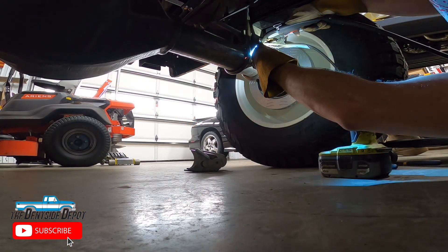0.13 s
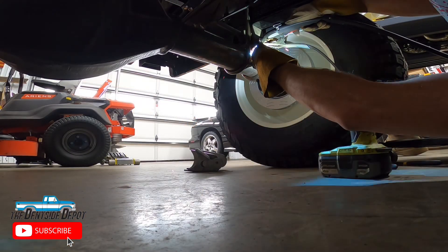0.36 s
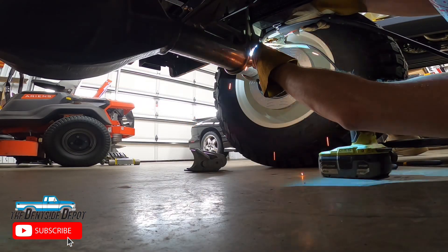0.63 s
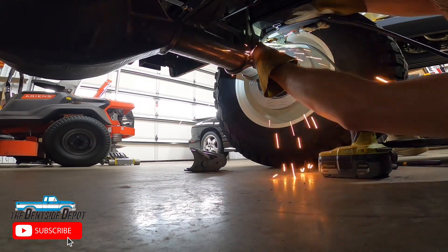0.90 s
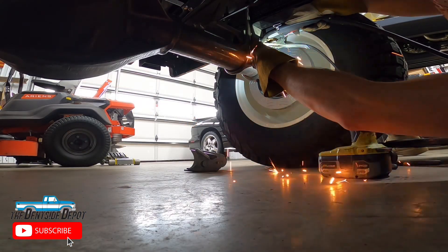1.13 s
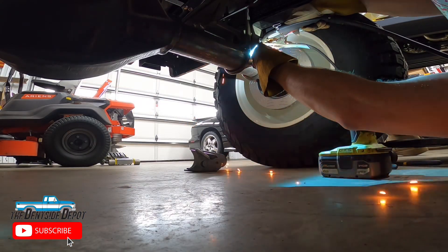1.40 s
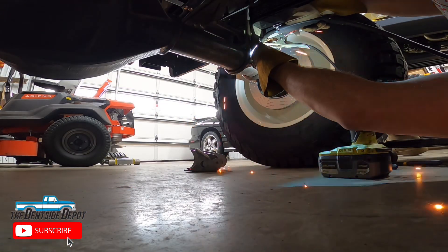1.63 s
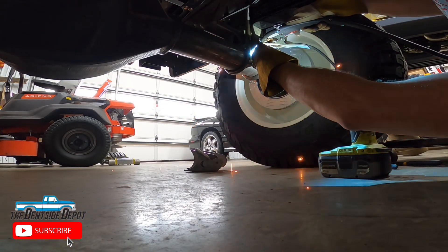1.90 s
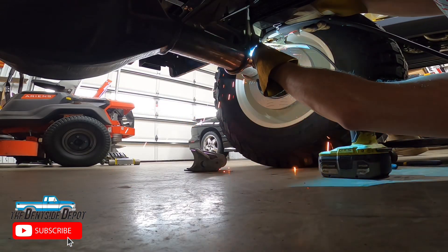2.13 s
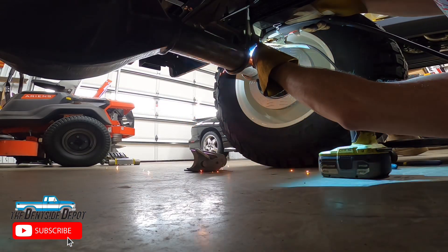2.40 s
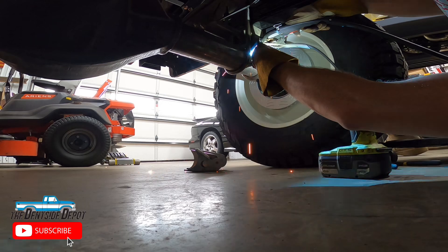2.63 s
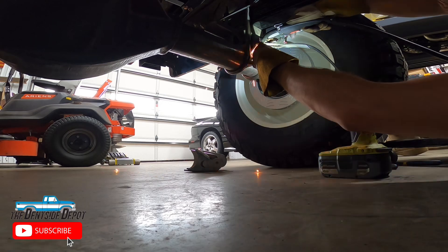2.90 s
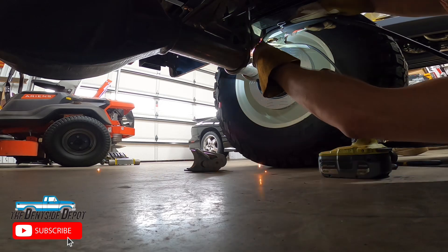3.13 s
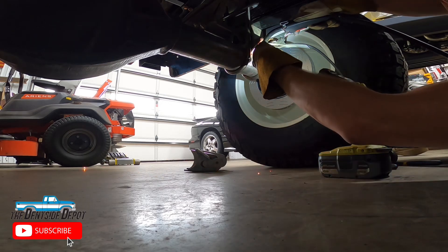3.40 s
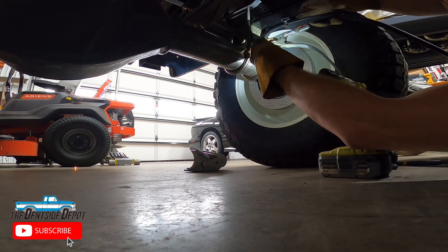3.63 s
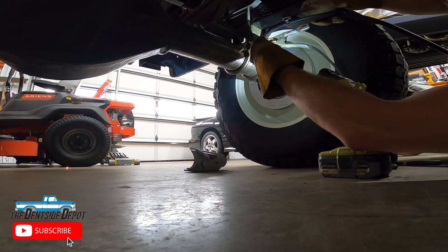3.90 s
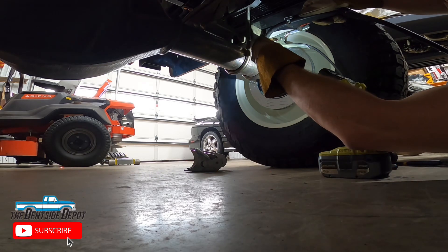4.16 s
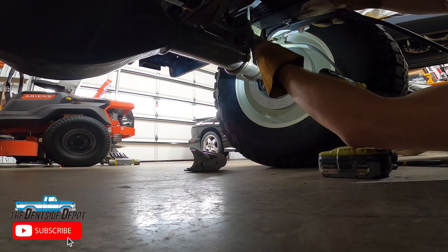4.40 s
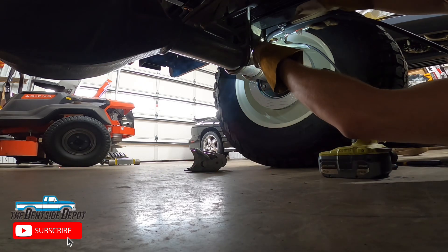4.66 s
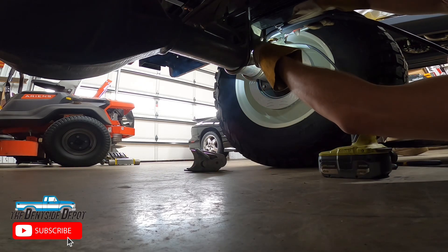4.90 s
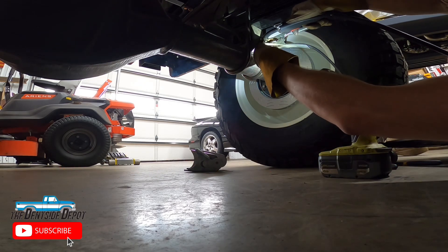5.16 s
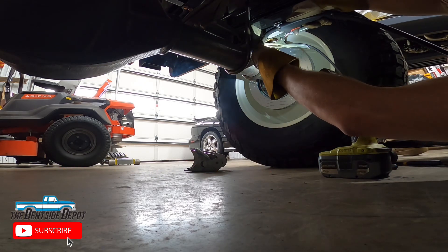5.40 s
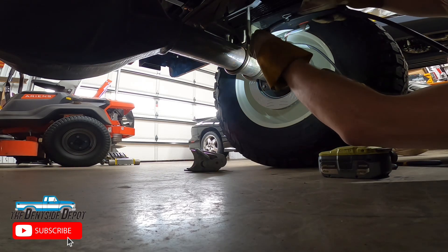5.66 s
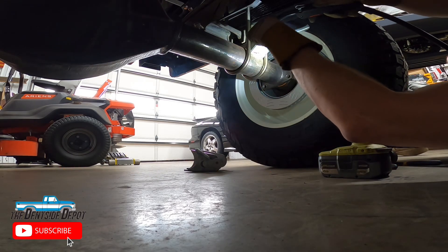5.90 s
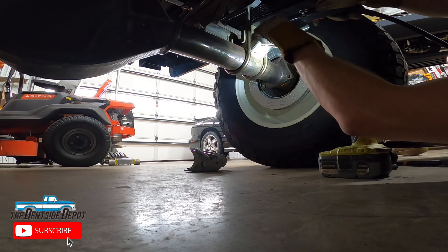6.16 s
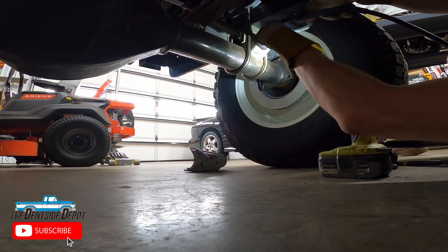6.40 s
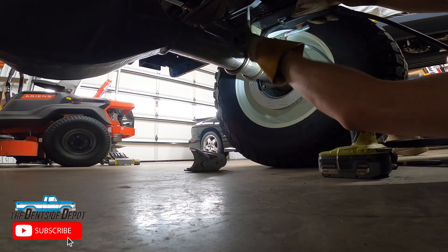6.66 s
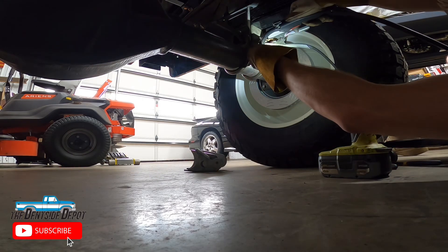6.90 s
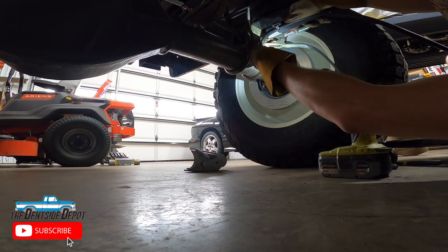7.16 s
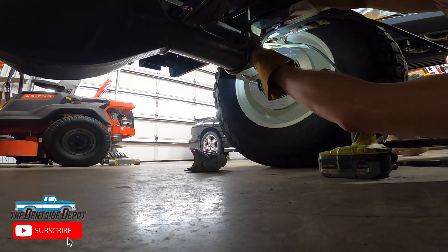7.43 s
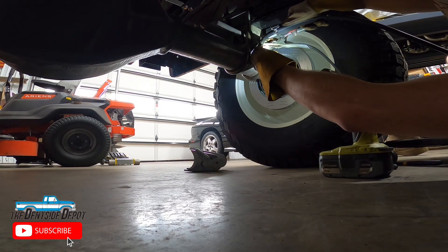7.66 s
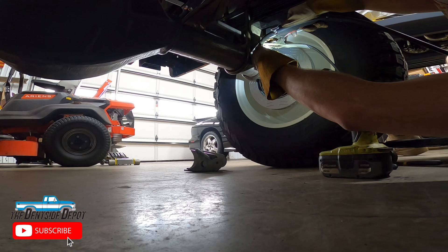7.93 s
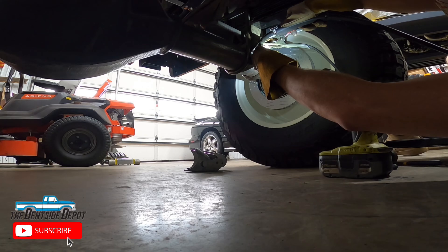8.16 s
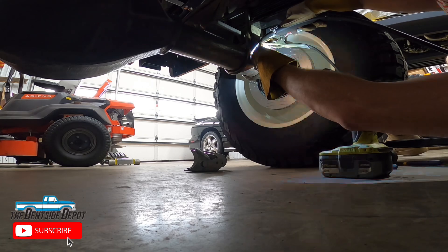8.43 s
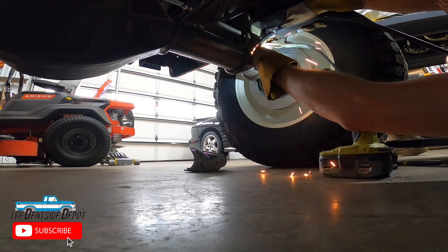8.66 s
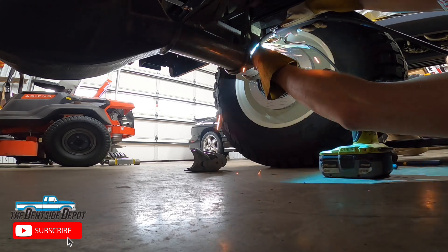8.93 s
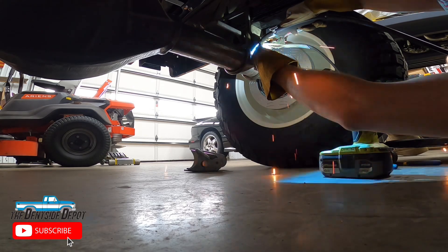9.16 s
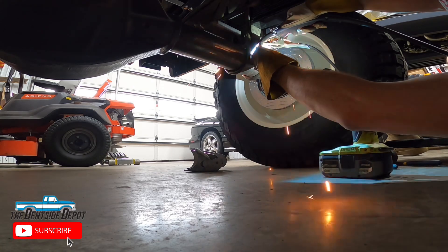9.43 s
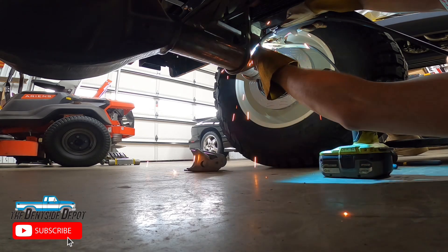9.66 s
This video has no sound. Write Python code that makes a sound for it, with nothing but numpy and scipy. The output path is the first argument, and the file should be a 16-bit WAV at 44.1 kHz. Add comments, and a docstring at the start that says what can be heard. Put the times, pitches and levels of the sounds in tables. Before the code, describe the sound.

Under a car in a workshop, a welding arc snaps in irregular hard pops and fast sputtering buzzes for about three seconds, ringing the exhaust pipe. It stops; gas hisses briefly and a valve clacks shut. A low fan hum swells up, with small metal ticks and faint glove rubs, before a gas puff and a second burst. Close microphones on the floor, peaks slightly distorted.

```python
"""A wire-feed welder tacks an exhaust pipe under a car in a workshop, close to two microphones on the floor.
The wire shorts and re-strikes in pops: each a sharp crack, its scatter off the underside and ringing metal.
Shielding gas, noise with whistling bands, hisses on briefly after the arc dies; puffs reach the right microphone.
A cooling fan hums throughout as wavering tones over air noise. The gas valve clacks shut with a puff and tools
tick in the pause, all as dying rattles; a glove brushes the pipe in soft swells, and the workshop adds a noise tail."""
import sys
import numpy as np
from scipy import signal
from scipy.fft import rfft, irfft
from scipy.io import wavfile
from scipy.ndimage import uniform_filter1d

SR = 44100
rng = np.random.default_rng(int(sys.argv[2]) if len(sys.argv) > 2 else 0)


def gain_from_decibels(decibels):
    """Convert decibel values to linear amplitude factors."""
    exponent = np.asarray(decibels, float) / 20
    return 10 ** exponent


def unload_audio(sound):
    """Save the sound as a 16-bit wav file, at the path given as the first command line argument."""
    columns = np.transpose(np.atleast_2d(sound))
    # keep every value between -1 and 1, then stretch to whole-number steps
    steps = np.round(np.clip(columns, -1, 1) * 32767)
    wavfile.write(sys.argv[1], SR, steps.astype(np.int16))


N = 432180  # length in samples

# blade tones of the fan: (f/Hz, level/dB, waver width/Hz)
FAN_TONES = [(235, -38, 6.7), (472.3, -50.5, 38), (710, -62, 15), (936, -67.5, 10), (1405, -68.5, 34)]
# colour of the fan's rush of air: (f/Hz, relative level per Hz/dB)
FAN_AIR = [(20, -35), (40, -13.5), (75, 1), (120, -30), (200, 7), (320, -12), (430, -9), (650, -13),
           (1400, -21), (4000, -38), (6000, -44.5), (9000, -60.5), (20000, -100)]
FAN_AIR_DB = -43.5
# decay of the workshop's tail: (f/Hz, t60/s)
SHOP_DECAY = [(200, 0.07), (700, 0.43), (2000, 1), (5000, 0.96), (12000, 0.361)]
# glove brushing the pipe: (t/s, level/dB, half length/s)
RUSTLES = [(5.754, -66.5, 0.033), (5.85, -65, 0.022), (6.103, -65.5, .04), (6.411, -67.5, 0.036),
           (6.965, -68, 0.027)]
# metal ticks in the pause, the gas valve's clack and puff as it shuts (3.631, 3.664), and the trigger:
# (t/s, level/dB, pitch f/Hz, t60/s)
KNOCKS = [(3.631, -34.5, 3810, 0.21), (3.664, -44, 11100, .2), (4.435, -52, 1900, 0.076),
          (5.468, -59, 4870, .042), (5.52, -36.5, 4300, 0.13), (5.53, -35.5, 1090, .2),
          (6.74, -44, 4160, .07), (8.422, -44, 6000, 0.031)]
# resonances that colour all of these: (f/Hz, width/Hz, relative level/dB)
KNOCK_MODES = [(1000, 950, 11.5), (1840, 660, 5), (2100, 130, 9.5), (3500, 610, 7), (4300, 1600, -3),
               (5030, 510, 0.5), (8740, 340, -6.5)]
# whistling bands of the torch nozzle: (f/Hz, width/Hz, relative level/dB)
NOZZLE_BANDS = [(1720, 200, -2), (5370, 200, -4), (6080, 377, -5), (6980, 330, -8.5), (8000, 300, -9),
                (9500, 500, -16.5)]
# colour of the gas jet: (f/Hz, relative level per Hz/dB)
JET_COLOUR = [(500, -57.5), (1500, -18), (3500, -23.5), (6000, -22.5), (9000, -27.5), (12000, -25.5),
              (15000, -37.5), (20000, -71)]
SHUT_S, OPEN_S = 3.63, 8.437  # the gas valve
WHISTLE_DB, WHISTLE_STOP_DB_PER_S = -47, 500
JET_DB, SURGE_DB, SURGE_S = -54.5, -35, .15  # the surge falls 10 dB in SURGE_S
DRAIN_S, DRAIN_DB_PER_S = 0.12, 187  # the hose empties after the valve shuts
# short pings as the arc dies: (t/s, level/dB, f/Hz, t60/s)
PINGS = [(2.964, -19, 1880, .04), (2.979, -18, 1850, .07)]
# low puffs of air on the right microphone just after pops: (t/s, level/dB, push +1 or pull -1)
PUFFS = [(.0088, -7, 1), (0.1559, -7.5, 1), (0.36, -8, 1), (0.495, -16, 1), (0.5102, -12, 1),
         (0.5782, -1.5, 1), (0.736, -13, 1), (0.8284, -7.5, 1), (8.5028, 0, -1), (8.619, -11, 1),
         (8.6533, -3.5, -1), (8.773, -16, 1)]
# colour of the pops' crack: (f/Hz, relative level per Hz/dB)
CRACK_COLOUR = [(40, -32.5), (300, -20), (1200, -9.5), (2200, 2), (2900, -3.5), (3500, -4.5), (4200, 2.5),
                (6000, -3.5), (8000, -4), (10300, -11), (11600, -4), (14000, -18.5), (20000, -65)]
# ringing of the exhaust pipe: (f/Hz, relative level/dB, t60/s)
PIPE_MODES = [(203.6, -11, 0.1), (382.4, -14, 0.06), (700, -7, 0.05), (860, -12, 0.06), (1065, -4, 0.06),
              (1125.8, -1, 0.08), (1175, -3, 0.07), (1260, -10, 0.08), (1923, -18, 0.04), (2780, -12, .03),
              (2930, -11, 0.035), (5900, -18, 0.03), (8500, -25, 0.03)]
# colour of the scatter off the car's underside: (f/Hz, relative level per Hz/dB)
UNDERSIDE_COLOUR = [(40, -20), (130, -10.5), (250, -5), (600, -0.5), (1150, 2), (2350, -8.5), (2900, -0.5),
                    (3600, -4.5), (5000, -7), (6000, -10.5), (8500, -10.5), (12000, -19.5), (14500, -34),
                    (20000, -69.5)]
# reflections off the nearest metal and the floor: (delay t/s, level/dB)
ECHOES = [(.00014, -3), (.0009, -12), (.0025, -9)]
# hard re-strikes of the wire after a long short-circuit: (t/s, relative level/dB)
STRIKES = [(0.0022, 0.5), (0.0955, -7.5), (0.1489, -1.5), (0.2526, -1), (0.3533, -4.5), (0.4251, -4),
           (0.491, -2.5), (0.5754, -1.5), (0.6189, -10.5), (0.6723, -3.5), (0.7102, -2), (.787, -17),
           (0.821, -2), (0.9202, -5), (0.999, -2), (1.058, 0.5), (1.095, -4), (1.1795, -9), (1.2303, -3.5),
           (1.275, -2.5), (1.3438, -2.5), (1.4002, 0.5), (1.4506, -2.5), (1.5394, -2), (1.5827, -0.5),
           (1.628, -4), (1.735, -12.5), (1.8412, -6), (2.2963, -4), (2.4827, -4.5), (2.5595, -8.5),
           (2.616, -1.5), (2.6516, -6), (2.6653, -3), (8.4625, -5), (8.4992, 2), (8.612, -1),
           (8.6363, -1.5), (8.7136, -8.5), (8.7645, -1), (8.7936, -6), (8.8916, -5.5), (8.9818, -5),
           (9.0578, -7.5), (9.113, -1.5), (9.1282, -3), (9.219, -8.5), (9.299, -2.5), (9.315, -3),
           (9.376, -1.5), (9.4003, -4), (9.4398, 0)]
# steady burning, a buzz of quick small pops:
# (start t/s, length/s, relative level at the start/dB, at the end/dB, cup ring below or above its pop/dB)
BUZZES = [(0.27, 0.048, -7, -25, -26.5), (0.5037, 0.033, -8.5, -20.5, -20.5),
          (0.7182, 0.027, -6.5, -24, -17.5), (0.9283, .025, -9, -13, -14), (1.108, .045, -9, -17.5, -23.5),
          (1.282, .02, -12, -16, -16), (1.461, 0.043, -8, -12.5, -16.5),
          (1.6347, 0.074, -9.5, -16.5, -20.5), (1.847, 0.41, -8, -10, -14), (2.309, .125, -6, -19.5, -14),
          (2.4923, .038, -10, -13.5, -15), (2.678, 0.25, -11, -8.5, -11.5), (8.6496, .035, -11, -19.5, 1),
          (8.8048, .055, -9.5, -12, -2), (8.991, .035, -8, -17, -32), (9.1346, 0.063, -11.5, -9, -3),
          (9.3255, .025, -18, -19, -12), (9.4553, 0.35, -7.5, -9.5, -4.5)]
GAP_S, GAP_SPREAD, POP_SPREAD_DB = .0082, .17, 1.8  # spacing and unevenness of the quick pops
CUP_HZ, CUP_T60_S = 5950, .008  # the torch's gas cup rings with each pop
CUP_DB = -12.5  # its level against a hard re-strike
SAME_PATH = .7  # weight of the scatter path that every pop has in common
BUILD_S, CRACK_DB = .002, 9.5  # scatter and pipe ringing build up behind the crack
# stereo width: (t/s, gain of the side signal/dB)
WIDTH = [(0, 2.5), (.8, 2), (1.1, -19.5), (1.3, -30.5), (3.9, -30), (5.0, -10), (6.0, -2), (7.0, 0.5),
         (8.75, 1), (9.0, -13.5), (9.2, -27), (9.8, -38)]


def read(points, hz):
    """Value of a spectrum table on a log-frequency axis."""
    f, value = np.transpose(points)
    return np.interp(np.log(hz + 1), np.log(f + 1), value)


def curve(rows):
    """A time curve at every sample."""
    return np.interp(np.arange(N) / SR, *np.transpose(rows))


def evened(x):
    """Scales to rms 1."""
    return x / np.sqrt(np.mean(x ** 2) + 1e-20)


def causal(points, size=2048):
    """Minimum-phase click with the given spectrum, peak 1."""
    log_gain = read(points, abs(np.fft.fftfreq(size, 1 / SR))) * np.log(10) / 20
    click = np.fft.ifft(np.exp(np.conj(signal.hilbert(log_gain)))).real[:size // 2]
    return click / abs(click).max()


def ring(modes, t, spread):
    """Dying sines, each of chance strength and detuned at random by about the share spread."""
    hz, db, t60 = np.transpose(modes)[:, :, None]
    chance = rng.standard_normal((2, len(modes), 1))
    decay = gain_from_decibels(db + 2 * chance[0] - 60 * t / t60)
    detuned_hz = hz * (1 + spread * chance[1])
    return (decay * np.sin(2 * np.pi * detuned_hz * t)).sum(0)


def noise(gain, apart_hz, patchy_db):
    """Two channels of noise with the spectrum gain(hz) and drifting patches."""
    frames, hz = N // 256 + 5, np.fft.rfftfreq(1024, 1 / SR)
    a, b, c, d, patches = rng.standard_normal((frames, 513, 5)).T
    patches = uniform_filter1d(patches, size=10, axis=0)
    patches = evened(uniform_filter1d(patches, size=14, axis=1))
    same = np.exp(-hz / apart_hz)[:, None]  # the channels drift apart toward the treble
    left = a + 1j * b
    right = same * left + np.sqrt(1 - same ** 2) * (c + 1j * d)
    z = np.array([left, right]) * gain(hz)[:, None] * gain_from_decibels(patchy_db * patches)
    return evened(signal.istft(z, nperseg=1024, noverlap=768)[1][:, :N])


def strike(rows, kinds):
    """Plays each row (t/s, level/dB) with one of several templates in turn."""
    trains = np.zeros((len(kinds), N))
    for k, (s, db) in enumerate(rows):
        trains[k % len(kinds), min(round(s * SR), N - 1)] = gain_from_decibels(db)
    return sum(signal.oaconvolve(train[None], kind, axes=1)[:, :N] for train, kind in zip(trains, kinds))


def fan():
    """Blade tones, each a steady sine that wavers, over the rush of air."""
    t, tones = np.arange(N) / SR, 0
    for hz, db, width in FAN_TONES:
        pole = np.exp(-np.pi * width / SR)
        two_poles = np.convolve([1, -pole], [1, -pole])
        drift = signal.lfilter([1], two_poles, rng.standard_normal((2, N)))
        waver = .95 + .22 * (evened(drift[0]) + 1j * evened(drift[1]))
        tones = tones + np.sqrt(2) * gain_from_decibels(db) * (waver * np.exp(2j * np.pi * hz * t)).real
    air = noise(lambda hz: gain_from_decibels(read(FAN_AIR, hz)), 9000, 1.5)
    return tones + gain_from_decibels(FAN_AIR_DB) * air


def shop(x):
    """Dense tail of the workshop, each band dying at its own speed."""
    taps = rng.standard_normal((2, SR)) * (np.arange(SR) > 500)  # starts about 11 ms late
    taps[1] = .7 * taps[0] + .7 * taps[1]
    hz, t, z = signal.stft(taps, SR, nperseg=256)
    decay = gain_from_decibels(-60 * t / read(SHOP_DECAY, hz)[:, None])
    tail = signal.istft(z * decay, SR, nperseg=256)[1]
    tail = tail / np.linalg.norm(tail[0])
    return signal.oaconvolve(x.mean(0)[None], tail, axes=1)[:, :N]


def glove():
    """Soft swells of bright friction noise."""
    t = np.arange(N) / SR
    swell = sum(gain_from_decibels(db) * np.exp(-((t - s) / half) ** 2) for s, db, half in RUSTLES)
    return swell * noise(lambda hz: gain_from_decibels(-7 * np.log2((hz + 1) / 4000) ** 2), 6000, 3.8)


def ticks_valve_and_trigger():
    """Small sounds, each a dying rattle through shared resonances near its own pitch."""
    t, out = np.arange(9000) / SR, np.zeros((2, N + 9000))
    hz = np.fft.rfftfreq(len(t), 1 / SR)
    body = gain_from_decibels(-5) + sum(gain_from_decibels(db) / (1 + (2 * (hz - f) / w) ** 2) for f, w, db in KNOCK_MODES)
    for s, db, centre_hz, t60 in KNOCKS:
        near_pitch = gain_from_decibels(-4 * np.log2((hz + 1) / centre_hz) ** 2)
        colour = body * near_pitch / (1 + (hz / 10500) ** 8)
        rattle = rng.standard_normal((2, len(t)))
        rattle = rattle[0] + 0.12 * rattle  # nearly the same at both microphones
        rattle = evened(irfft(rfft(rattle) * colour, len(t)))
        envelope = gain_from_decibels(db - 60 * t / t60) * (1 - np.exp(-t / 0.00013))
        out[:, round(s * SR):][:, :len(t)] += envelope * rattle
    return out[:, :N]


def gas():
    """A jet of noise and narrow whistling bands from the nozzle; the jet surges as the valve opens."""
    t = np.arange(N) / SR
    shut = (t > SHUT_S) & (t < OPEN_S)

    def bands(hz):
        return sum(gain_from_decibels(db) / np.hypot(1, 2 * (hz - f) / w) ** 2 for f, w, db in NOZZLE_BANDS)

    whistle = noise(bands, 15000, 2.1)
    whistle_gain = gain_from_decibels(WHISTLE_DB - shut * WHISTLE_STOP_DB_PER_S * (t - SHUT_S))
    jet = noise(lambda hz: gain_from_decibels(read(JET_COLOUR, hz)), 15000, 2.3)
    jet_gain = gain_from_decibels(JET_DB - shut * DRAIN_DB_PER_S * np.maximum(t - SHUT_S - DRAIN_S, 0))
    onset = np.clip((t - OPEN_S) / .006, 0, 1)
    surge = (t > OPEN_S) * gain_from_decibels(SURGE_DB - 10 * abs(t - OPEN_S) / SURGE_S) * onset
    return whistle_gain * whistle + (jet_gain + surge) * jet


def pings():
    """One dying tone each, with a soft start."""
    t, out = np.arange(4000) / SR, np.zeros(N)
    for s, db, hz, t60 in PINGS:
        tone = ring([(hz, db, t60)], t, .005)
        out[round(s * SR):][:len(t)] += tone * (1 - np.exp(-t / .003))
    return out


def puffs():
    """A short swing of pressure on the right microphone, an opposite swing, then a slow creep back."""
    t, out = np.arange(-300, 1500) / SR, np.zeros(N + 1800)
    swing = np.exp(-(t / 0.0012) ** 2)
    creep = 0.28 * (t > 0) * (1 - np.exp(-(t / 0.003) ** 2)) * np.exp(-t / 0.0099)
    for s, db, way in PUFFS:
        out[round(s * SR):][:len(t)] += np.sign(way) * gain_from_decibels(db) * (swing - creep)
    return np.array([np.zeros(N), out[300:N + 300]])


def snap(points, count=16, size=256):
    """A sharp inward spike with a swing outward on both sides, its centre count samples in; peak 1."""
    spike = irfft(gain_from_decibels(read(points, np.fft.rfftfreq(size, 1 / SR))))
    spike = np.roll(spike, size // 2) * np.hanning(size)
    return -spike[size // 2 - count:] / spike.max()


def pops():
    """All pops by time as (t/s, level/dB, cup level/dB): hard re-strikes and the quick ones of each buzz."""
    rows = [(s, db, db + CUP_DB) for s, db in STRIKES]
    for start, length, first_db, last_db, cup_db in BUZZES:
        gap, size = rng.standard_normal((80, 2)).T
        gaps = GAP_S * np.exp(GAP_SPREAD * gap)
        t = np.cumsum(gaps) - gaps[0]  # the first pop falls on the start
        db = first_db + (last_db - first_db) * t / length + POP_SPREAD_DB * size
        rows += list(np.transpose([start + t, db, db + cup_db])[t < length])
    return np.array(sorted(rows, key=lambda row: row[0]))


def arc(count=6):
    """Each pop is a direct crack with echoes, plus scatter off the car's underside and the ringing pipe and cup."""
    t, cracks, scatters, rings = np.arange(8000) / SR, [], [], []
    build = 1 - np.exp(-t / BUILD_S)
    scatter_decay = gain_from_decibels(-22 - 60 * t / .025) + gain_from_decibels(-27 - 60 * t / .2)
    path = rng.standard_normal((3, len(t)))
    for _ in range(count):
        splutter = gain_from_decibels(-23 - 60 * t / .005) * rng.standard_normal(len(t))
        splutter[0] = 1
        for delay, db in ECHOES:
            splutter[round(delay * SR)] += gain_from_decibels(db)
        # the left microphone is a touch farther: two samples later and softer
        direct = np.array([np.roll(splutter, shift=2), splutter]) * gain_from_decibels([[-1.5], [1.5]])
        cracks.append(signal.fftconvolve(direct, snap(CRACK_COLOUR)[None], axes=1)[:, :len(t)])

        own_path = rng.standard_normal(path.shape)
        taps = SAME_PATH * path + np.sqrt(1 - SAME_PATH ** 2) * own_path
        both, left, right = taps * build * scatter_decay
        apart = 1.3 * np.diff([left, right], prepend=0)  # mostly short waves differ between the microphones
        scatter = signal.fftconvolve(both + apart, causal(UNDERSIDE_COLOUR)[None], axes=1)
        scatters.append(scatter[:, :len(t)])
        rings.append(ring(PIPE_MODES, t, 0.016)[None] * build)

    s, db, cup_db = pops().T
    wait = np.clip(np.diff(s, prepend=-1), .004, .06)
    # a long short-circuit cracks hard, a quick one mostly rings the pipe
    blow_db = 0.5 * db - 2.5 * np.log2(wait / 0.032)
    cup = ring([(CUP_HZ, 0, CUP_T60_S)], t, 0)[None]
    crack = gain_from_decibels(CRACK_DB) * strike(zip(s, db), cracks) + strike(zip(s, cup_db), [cup])
    scatter = gain_from_decibels(4) * strike(zip(s, db), scatters) + gain_from_decibels(-9) * strike(zip(s, blow_db), scatters)
    pipe = gain_from_decibels(-10) * strike(zip(s, blow_db), rings)
    return crack, scatter + pipe


def scene():
    """Near sources with their room tail, gas and fan; the stereo width narrows and opens, and puffs come on top."""
    crack, body = arc()
    small = ticks_valve_and_trigger() + pings()
    near = body + glove()
    tail = shop(gain_from_decibels(-10.0) * near + gain_from_decibels(-15) * small)
    left, right = crack + near + small + tail + gas() + fan()
    mid, side = (left + right) / 2, (left - right) / 2
    # only the side signal below 12.5 kHz changes width
    below = signal.oaconvolve(side, signal.firwin(201, 12500, fs=SR), "same")
    side = side - below * (1 - gain_from_decibels(curve(WIDTH)))
    return np.array([mid + side, mid - side]) + puffs()


def top_cut(x):
    """Nothing passes above the cut-off."""
    return signal.sosfilt(signal.butter(12, 16470, fs=SR, output="sos"), x)


def record(dry):
    """Gain control ducks everything while the arc burns and lets the hum swell back; peaks clip."""
    power = uniform_filter1d((dry ** 2).mean(0), size=4000)
    power_db = 10 * np.log10(abs(power) + 1e-12)
    fall = np.arange(N) * 19.2 / SR  # the held level falls 19.2 dB a second
    held_db = np.maximum.accumulate(power_db + fall) - fall
    over_db = np.maximum(held_db + 32.5, 0)  # above a threshold of -32.5 dB
    ducked = dry / gain_from_decibels(0.38 * uniform_filter1d(over_db, size=2000))
    return top_cut(np.clip(ducked, -1, 1))


dry = scene()
out = record(dry)
unload_audio(out)
```